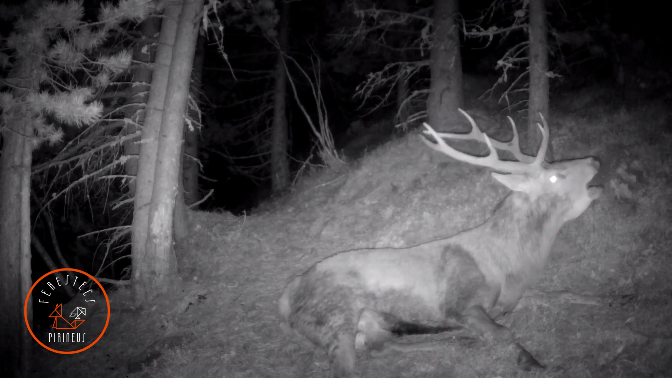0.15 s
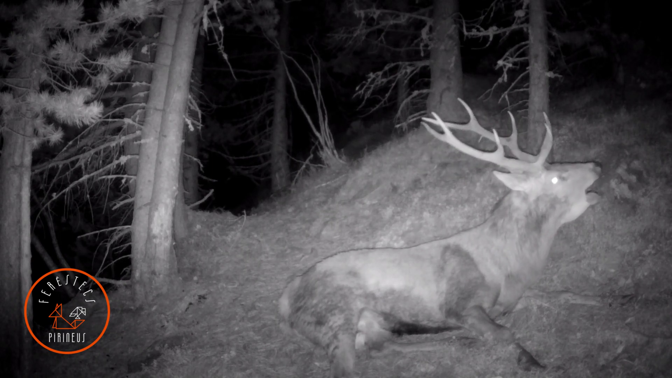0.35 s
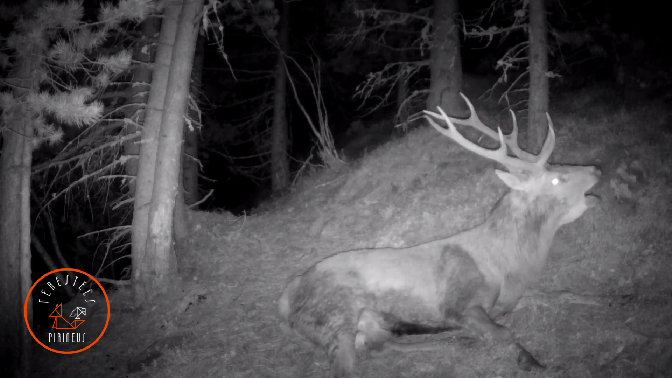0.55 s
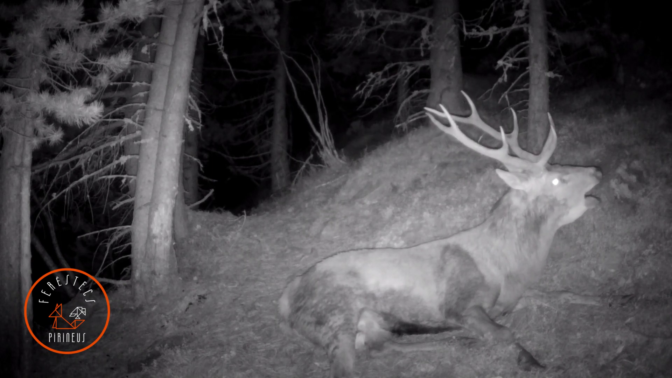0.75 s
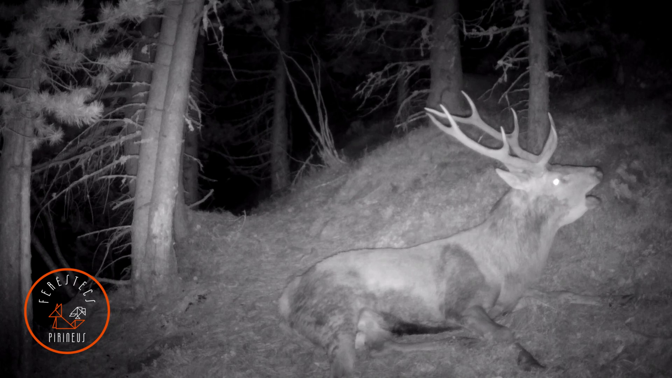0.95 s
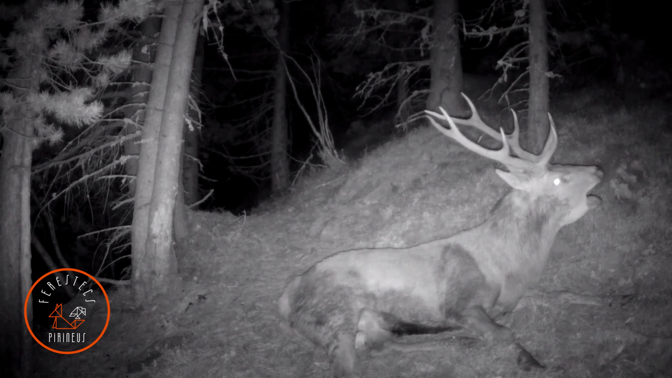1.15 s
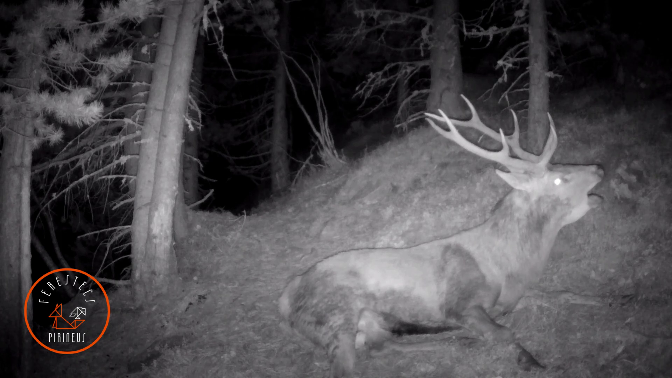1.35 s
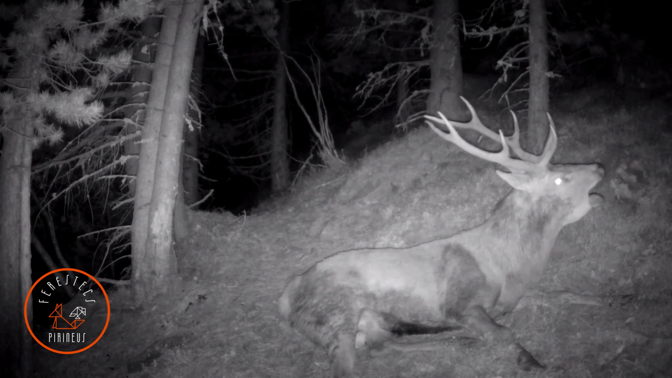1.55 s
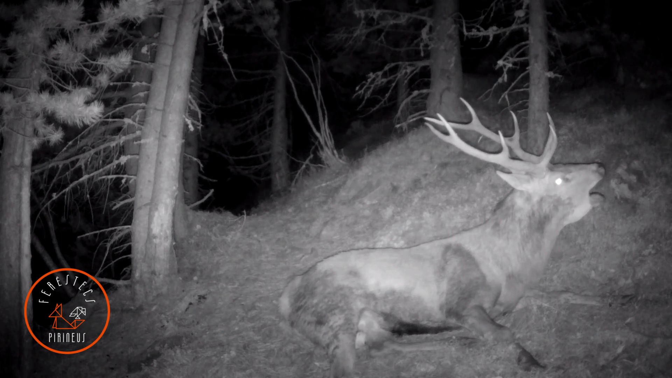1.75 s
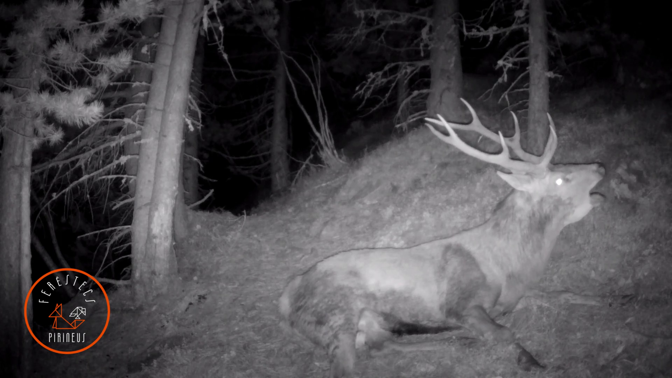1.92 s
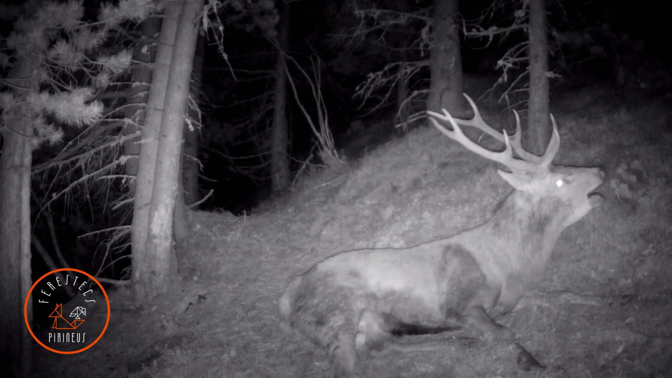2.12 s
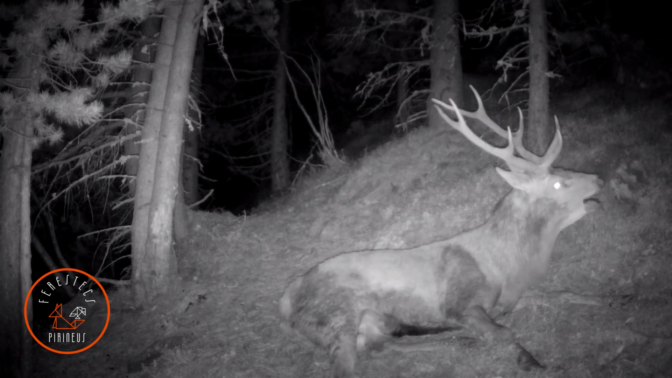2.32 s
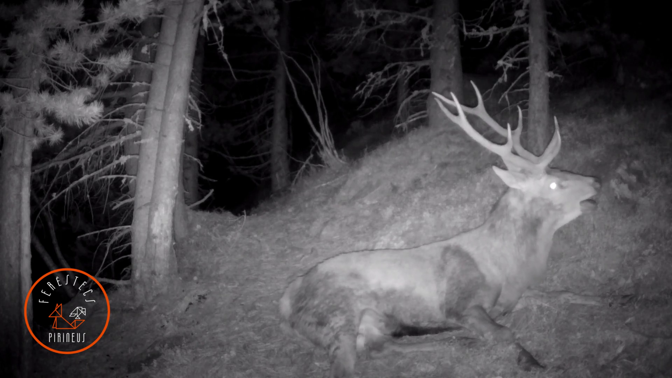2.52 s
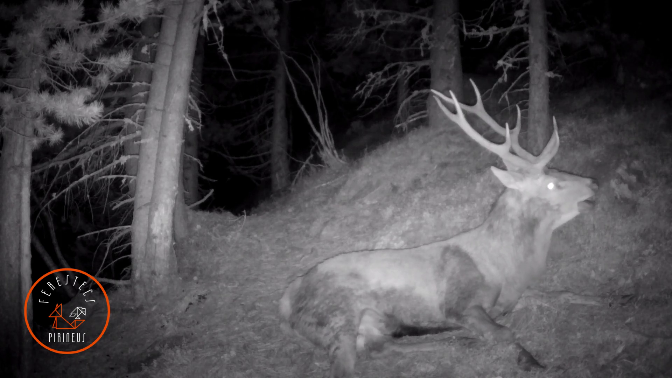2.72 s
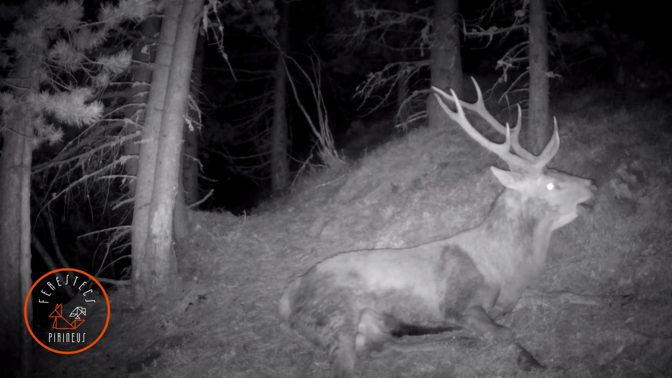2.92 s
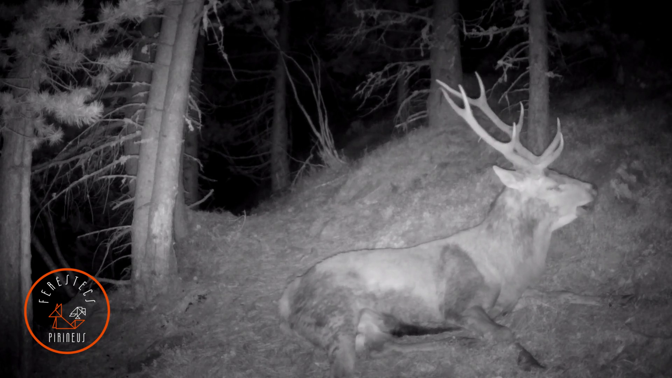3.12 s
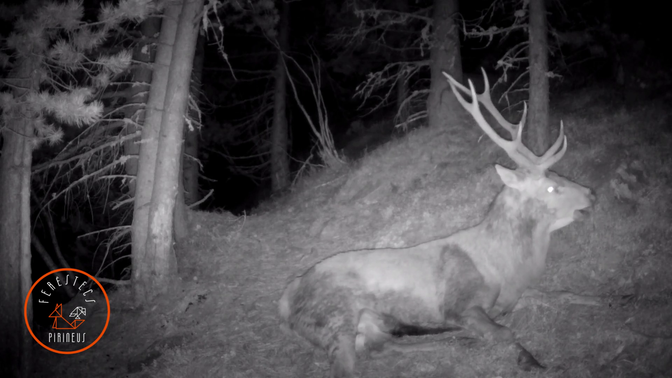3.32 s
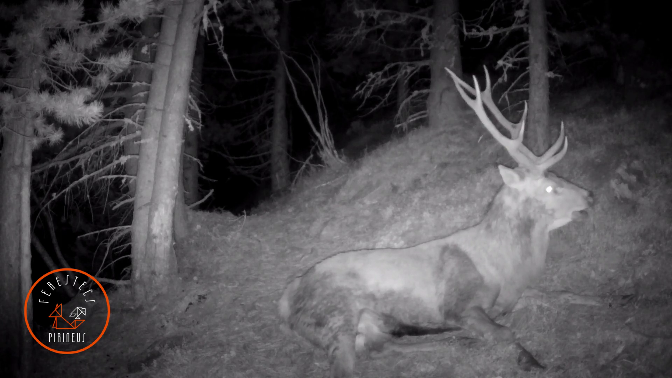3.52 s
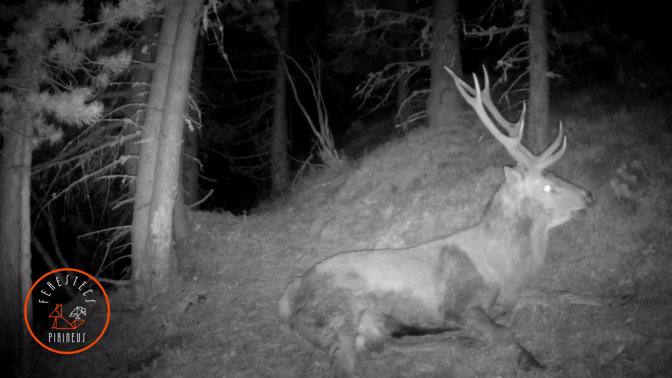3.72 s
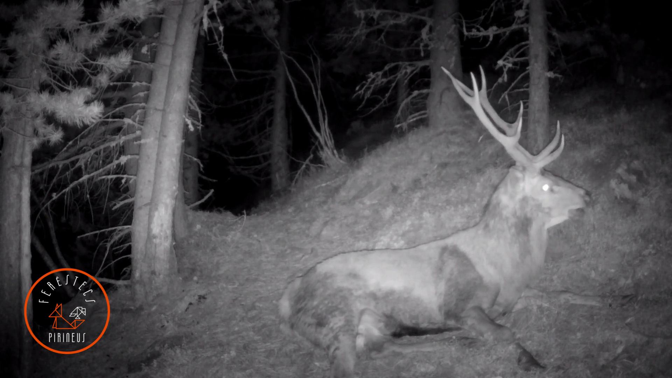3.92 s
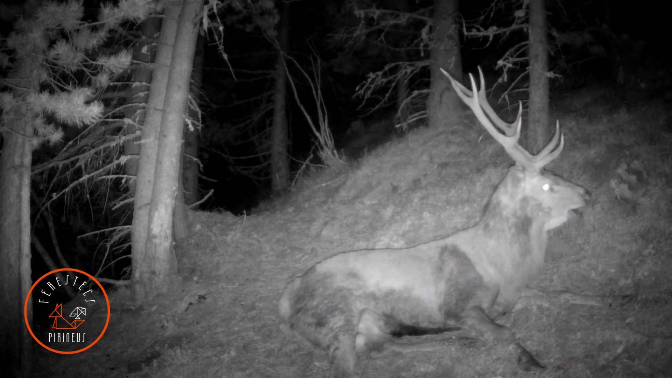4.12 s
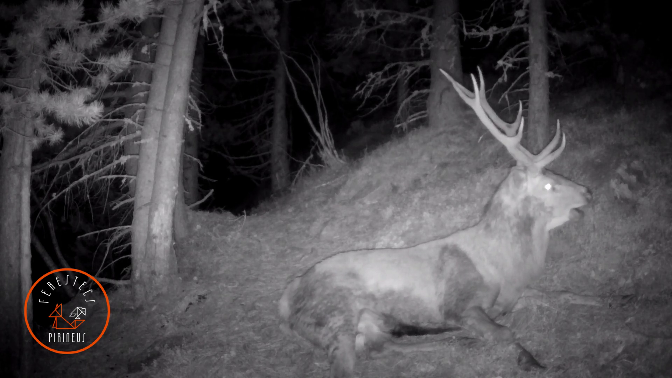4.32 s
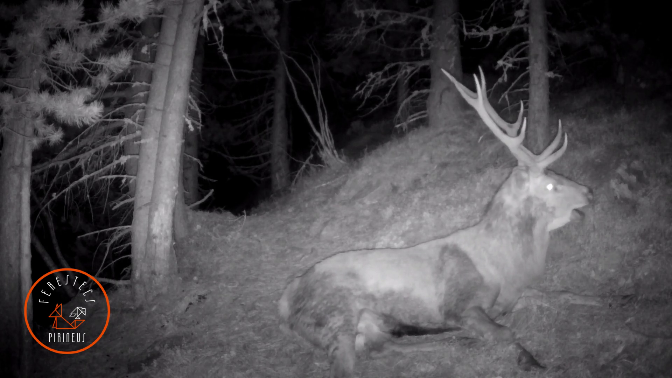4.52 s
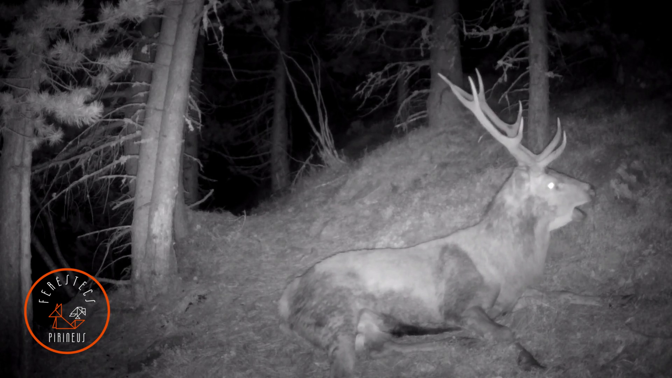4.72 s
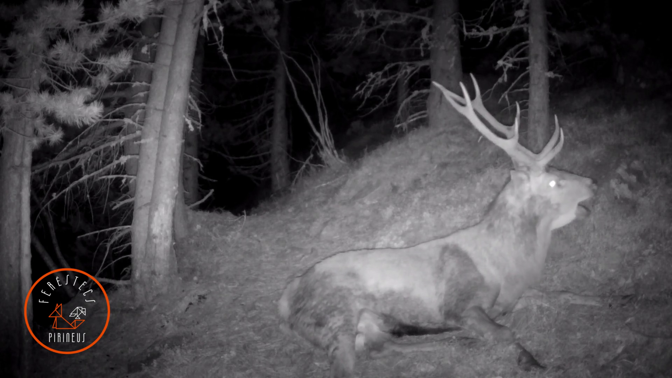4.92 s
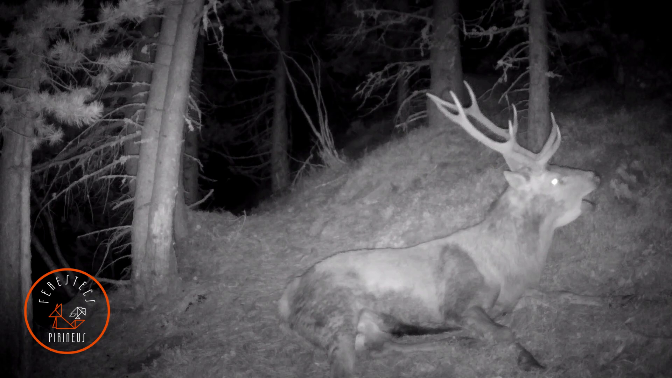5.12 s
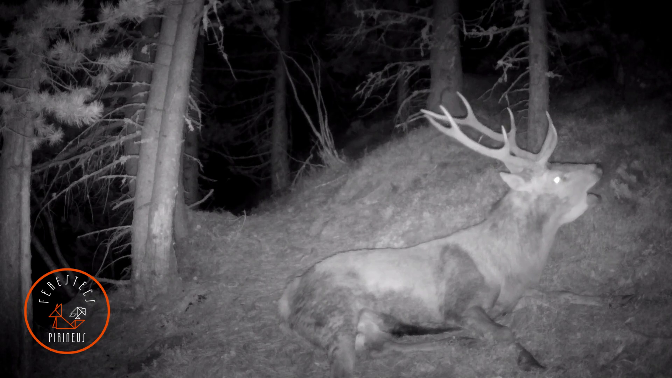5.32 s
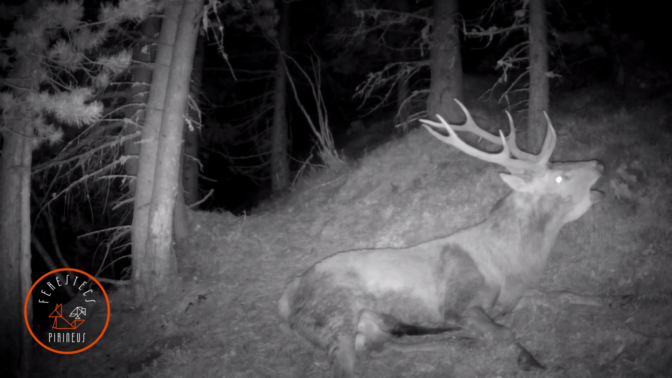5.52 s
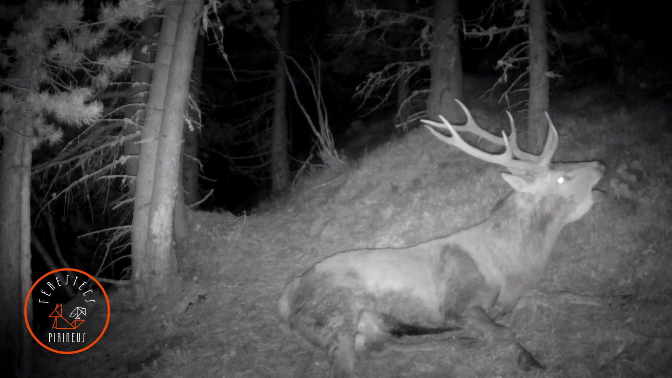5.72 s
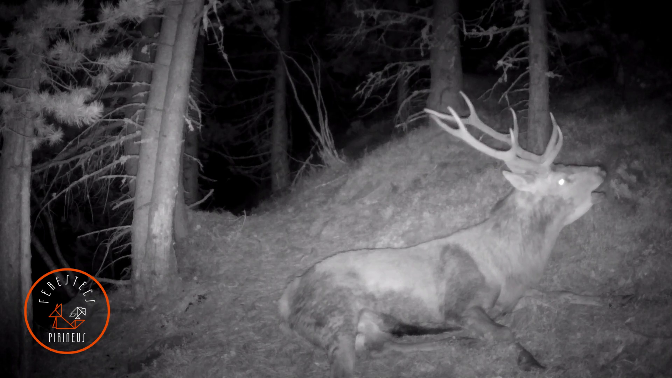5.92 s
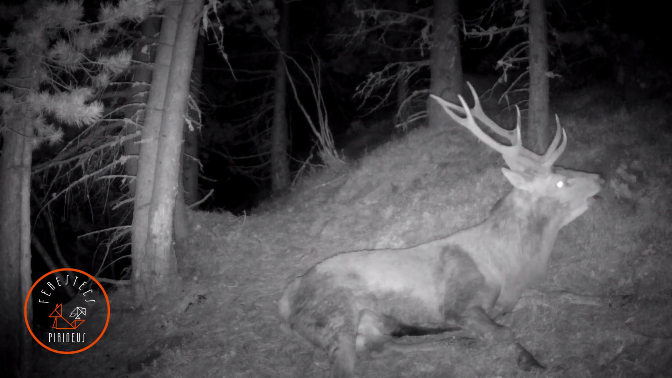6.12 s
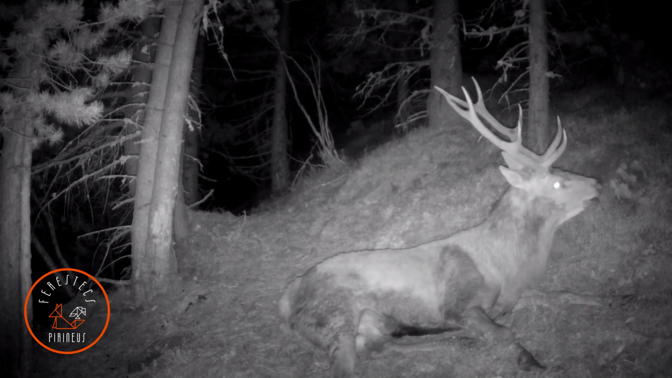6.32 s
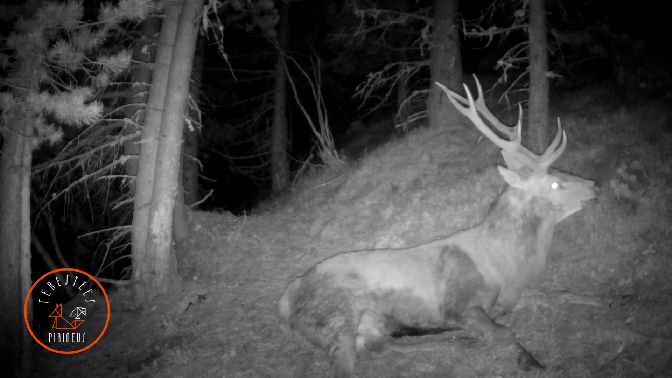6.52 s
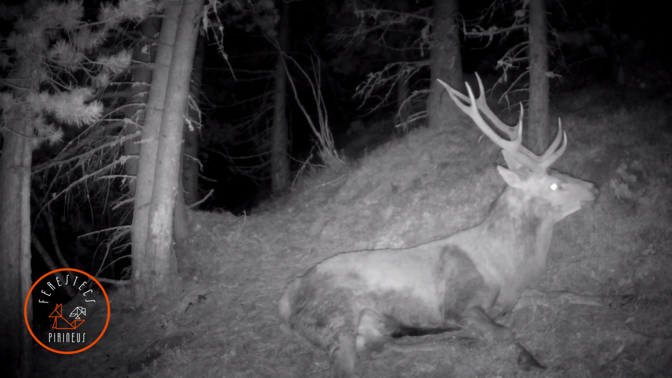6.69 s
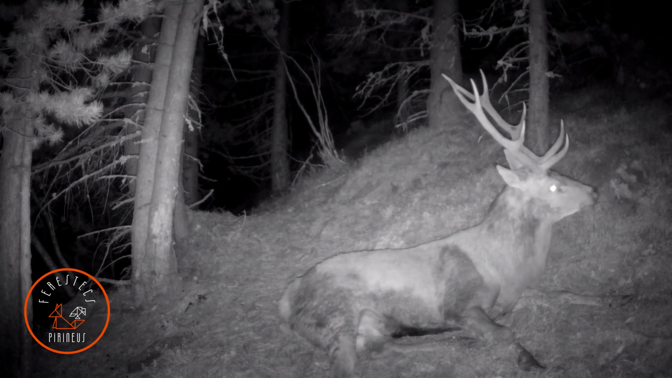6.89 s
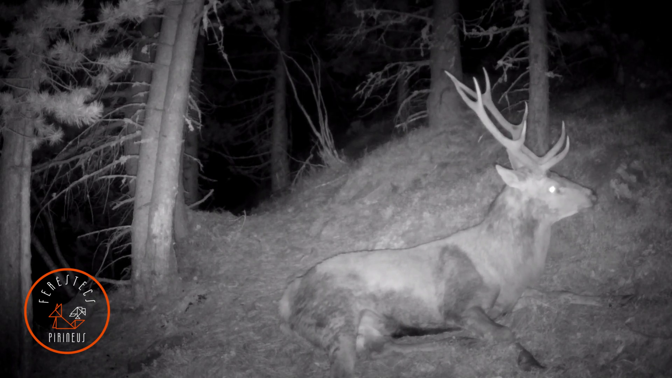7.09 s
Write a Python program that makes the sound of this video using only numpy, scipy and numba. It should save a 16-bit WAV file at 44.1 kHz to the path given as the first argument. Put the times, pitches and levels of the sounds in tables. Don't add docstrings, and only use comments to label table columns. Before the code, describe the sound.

A red deer stag roars close by in a still night forest, caught by a small camera microphone with steady, mid-toned hiss. From 0 s a deep, coarse, buzzing bellow is already in progress; its pitch dips around 0.6 s, rises again towards 1.4 s, then falls and breaks into a few slowing creaks just after 2 s. Faint woodland echo fades into hiss. At about 2.85 s slow creaky pulses start a second roar, lower, quieter and more closed, a groan sinking and weakening until it crackles out near 3.6 s. Another pause. From about 4.13 s a third roar starts pinched and creaky, then opens around 4.7 s, swelling unevenly to a strong, harsh bellow at 5.2 to 5.8 s, with breathy hiss and slight overload. It drops sharply in pitch and stutters to a stop just after 5.9 s, leaving faint echo and microphone hiss.

```python
import sys
import numpy as np
from scipy import signal
from scipy.fft import rfft, irfft, next_fast_len
from scipy.io import wavfile
from scipy.ndimage import map_coordinates
from numba import njit

SR = 44100
rng = np.random.default_rng(int(sys.argv[2]) if len(sys.argv) > 2 else 0)


def boost_factor(decibels):
    exponent = np.asarray(decibels, float) / 20
    return 10 ** exponent


def store_wav(level_fs):
    pcm = np.round(np.clip(np.atleast_2d(level_fs), -1, 1) * 32767)
    wavfile.write(sys.argv[1], SR, pcm.T.astype(np.int16))


N = 315299
LEAD = 4480
SPAN = N + LEAD
TIME = (np.arange(SPAN) - LEAD) / SR


def along(points, hz):
    f, v = np.transpose(points)
    return np.interp(np.log(hz + 1), np.log(f + 1), v)


def coloured(x, points):
    m = next_fast_len(SPAN + 8192)
    gain = boost_factor(along(points, np.fft.rfftfreq(m, 1 / SR)))
    cepstrum = irfft(np.log(gain), m)
    cepstrum[1:m // 2] *= 2
    cepstrum[m // 2 + 1:] = 0
    return irfft(rfft(x, m) * np.exp(rfft(cepstrum)), m)[..., :x.shape[-1]]


def curves(rows):
    s, *cols = np.transpose(rows)
    return [np.interp(TIME, s, c) for c in cols]


def rounded(rows):
    s, *cols = np.transpose(rows)
    k = np.clip(np.searchsorted(s, TIME) - 1, 0, len(s) - 2)
    gap, out = np.diff(s)[k], []
    u = np.clip((TIME - s[k]) / gap, 0, 1)
    for c in cols:
        rise = np.pad(np.diff(c) / np.diff(s), 1, "edge")
        before, after = rise[:-1], rise[1:]
        slope = 2 * np.maximum(after * before, 0) / (after + before + 1e-9)
        bend = (1 - u) * (slope[k] - rise[k + 1]) + u * (rise[k + 1] - slope[k + 1])
        out.append(c[k] + gap * u * (rise[k + 1] + (1 - u) * bend))
    return out


def wobble(rate):
    knots = rng.standard_normal(int(SPAN * rate / SR) + 4)
    return map_coordinates(knots, [np.arange(SPAN) * rate / SR])


def microphone_hiss():
    # pitch_hz [Hz], level_db [dB per Hz]
    hiss_colour = [(30, -40.5), (200, -12.5), (400, -7.5), (700, -1.5), (1350, -2.9), (2000, -12.5),
                   (3000, -24), (4200, -33.5), (5600, -47), (7500, -45.5), (16000, -50.5)]
    hiss = coloured(rng.standard_normal(N), hiss_colour)
    return boost_factor(-60) * hiss / hiss.std()


def echoes(x, decay):
    _, t, z = signal.stft(rng.standard_normal(SR), SR, nperseg=256)
    hz = np.fft.rfftfreq(256, 1 / SR)
    fading = z * boost_factor(-60 * t / along(decay, hz)[:, None])
    tail = signal.istft(fading, SR, nperseg=256)[1]
    late = np.pad(x, (500, 0))
    return signal.fftconvolve(late, tail / np.linalg.norm(tail))[:SPAN]


def capsule(x):
    # pitch_hz [Hz], gain_db [dB]
    output_colour = [(30, -0.5), (200, 2.5), (2500, -2.27), (4500, -9.5), (7200, -15.5), (7800, -18),
                     (16000, -8.5)]
    top = np.where(x > 0, .6, .5)
    squashed = x / (1 + np.abs(x / top) ** 12) ** (1 / 12)
    return coloured(squashed, output_colour)


@njit
def ring(x, hz, radius, gain, scale, leak, step):
    out = np.zeros(len(x))
    for k in range(len(hz)):
        y1 = y2 = 0.0
        for n in range(2, len(x)):
            r = radius[k] * leak[n]
            y = x[n] - x[n - 2] + 2 * r * np.cos(step * hz[k] * scale[n]) * y1 - r * r * y2
            y1, y2 = y, y1
            out[n] += gain[k] * y
    return out


def lips(drive):
    # pitch_hz [Hz], width_hz [Hz], level_db [dB]
    cavities = [(5560, 45, -42), (6200, 40, -35.5), (6900, 100, -42.5)]
    hz, width, db = np.transpose(cavities)
    radius, steady = np.exp(-np.pi * width / SR), np.ones(SPAN)
    return ring(drive, hz, radius, boost_factor(db) * (1 - radius ** 2), steady, steady, 2 * np.pi / SR)


def pulses(s, size):
    tap = np.floor(s * SR)[:, None] + np.arange(-7, 9)
    lag = tap - s[:, None] * SR
    shape = size[:, None] * np.sinc(lag) * np.cos(np.pi * lag / 16) ** 2
    place = np.clip(tap + LEAD, 0, SPAN - 1).astype(int)
    return np.bincount(place.ravel(), shape.ravel(), SPAN)


def creaks(runs, ratio, count):
    s, gap, db, step_db = np.transpose(runs)[..., None]
    k = np.arange(count)
    at = s - .002 + gap * (1 - ratio ** k) / (1 - ratio)
    return pulses(at.ravel(), boost_factor(db + step_db * k + 18.5).ravel())


def folds(rows, scatter_db):
    # time_s [s], level_db [dB]
    level_bumps = [(.1, 3.5), (.15, -2.5), (.26, 3), (.37, 1), (.8, 1.5), (.97, 2), (2.93, 2), (2.975, 2.5),
                   (4.35, 2), (4.49, -0.5), (5.0, -2), (5.08, -2.5), (5.14, -2), (5.235, 2.5), (5.32, -2.5),
                   (5.385, 1), (5.435, -2), (5.525, 0.5), (5.765, -4), (5.795, 2.5)]
    bump_s, edge_s = .027, .025
    effort_db, pitch = rounded(rows)
    for s, db in level_bumps:
        effort_db = effort_db + db * np.exp(-((TIME - s) / bump_s) ** 2)

    start, end = rows[0][0], rows[-1][0]
    glide = np.abs(np.gradient(np.log(pitch))) * SR
    edge = np.exp(-np.minimum(np.abs(TIME - start), np.abs(TIME - end)) / edge_s)
    rough = .02 + .1 * glide + .4 * edge

    pitch = pitch * (1 + .002 * wobble(25))
    on = (TIME >= (start or -1)) & (TIME <= end)
    cycle = np.cumsum(pitch * on) / SR
    s = np.interp(np.arange(int(cycle[-1] + .55)), cycle[on], TIME[on])
    at = (s * SR).astype(int) + LEAD
    late, louder = rng.standard_normal((400, 2))[:len(s)].T
    s = s + late * (.0008 + .06 * rough[at] ** 2) / pitch[at]
    size = boost_factor(effort_db[at] + louder * (scatter_db + 3 * rough[at] ** 2))
    beat = pulses(s, size * np.sqrt(SR / pitch[at]))
    puff = np.cos(np.pi * cycle) ** 2 * rng.standard_normal(SPAN) * on
    return beat, boost_factor(effort_db + 18 * rough) * puff, on


def throat(drive, leak):
    # time_s [s], shortness [pitch factor], chest [extra pitch factor], mouth_opening [0-1]
    larynx = [(0, 0.94, 1.02, .58), (.3, 1.01, 0.99, 0.88), (.5, 1.048, 0.95, 0.98),
              (1.1, 1.034, 1.036, 0.94), (1.9, 1.004, 0.97, 0.93), (2.1, 1.052, 0.99, 0.97),
              (2.8, 1.033, 1.01, 0.21), (3.55, 1.05, 0.93, 0.06), (4.1, 1.26, .97, 0),
              (4.42, 1.32, 1.08, .09), (4.62, 1.28, 0.96, 0.49), (4.8, 1.232, 0.907, 0.92),
              (4.93, 1.14, 0.93, 0.9), (5.15, 1.114, 0.95, 0.7), (5.35, 1.016, 0.92, 0.96),
              (5.8, 1, 1.02, 0.91), (6.0, 1.105, 0.91, 0.5)]
    # pitch_hz [Hz], width_hz [Hz], level_db [dB]
    open_modes = [(206, 12, -13), (477.4, 13.8, 0.5), (639.4, 21.2, -3.5), (944.7, 28, 1.5),
                  (1289, 55.6, -3), (1414.6, 114, -8.5), (1598, 42, -10.5), (1849, 18, -18.5),
                  (2018.5, 17, -10.5), (2239, 35, -16.5), (2426, 21, -18), (2706, 33, -23.5),
                  (3066, 40, -19.5), (3358, 17, -23.5), (3670, 66, -29), (3840, 39, -26.5), (3945, 31, -28)]
    closed_modes = [(218, 450, -24.5), (395, 50, -12), (614, 100, -19), (705, 340, -19.5),
                    (951.4, 18, -7.5), (1178, 110, -15), (1400.4, 54, -5.5), (1689.5, 27, -1.5),
                    (2218, 50, -13.5), (2416, 29, -15.5), (2760, 22, -22), (2920, 90, -32),
                    (3040, 51, -23.5), (3510, 78, -22), (4020, 70, -26.5)]
    # pitch_hz [Hz], gain_db [dB]
    housing = [(60, -16), (150, -7), (250, -9), (380, -3.5), (520, 1.9), (700, -0.9), (880, -5), (1100, 5),
               (1430, 8.5), (1660, 9), (1790, -5.5), (2050, 5), (3980, 6), (4400, -25.5)]
    band_edges = (850, 1150, 1800)
    open_db = (-7, -18.5, 2.12, -13.5)
    closed_db = (-14.5, -18, 2.2, -11.5)
    high_db = (5, 46.5, -5, 3.5)

    short, chest, opening = curves(larynx)
    opening = np.clip(opening, 0, 1)
    upper = short * np.minimum(chest, 1) ** .4
    sink = np.array([short * chest, short, short, upper])
    still = np.ones(sink.shape)
    lift = boost_factor(np.transpose([high_db]) * (sink - 1))
    tremor = 1 + .003 * wobble(14)
    shapes = (
        (open_modes, sink, opening * lift, open_db),
        (closed_modes, 1.04 * still, (1 - opening) * still, closed_db),
    )
    out = np.zeros(drive.shape)
    for modes, scale, share, power_db in shapes:
        hz, width, db = np.transpose(modes)
        radius = np.exp(-np.pi * width / SR)
        gain = boost_factor(db) * (1 - radius ** 2) * (-1.0) ** np.arange(len(hz))
        passed = 4 * boost_factor(db + along(housing, hz)) ** 2 * np.pi * width / SR
        for band in range(len(drive)):
            own = np.digitize(hz, band_edges) == band
            level = boost_factor(power_db[band]) / np.sqrt(passed[own].sum())
            out[band] += ring(drive[band] * share[band], hz[own], radius[own], level * gain[own],
                              scale[band] * tremor, leak, 2 * np.pi / SR)
    return coloured(out, housing)


def stag():
    # time_s [s], effort_db [dB], pitch_hz [Hz]
    first_roar = [(0.0, -11, 132.4), (.15, -13.5, 120.4), (.4, -16, 105.7), (.63, -17, 100.6),
                  (.8, -16.5, 106.7), (1.08, -15, 124.4), (1.36, -12.5, 129.2), (1.9, -14, 118.3),
                  (2.03, -14.5, 105.4)]
    second_roar = [(2.885, -24.5, 79.4), (2.957, -23, 88.65), (3.001, -23, 82.55), (3.096, -22.5, 79.5),
                   (3.238, -22.5, 74.4), (3.361, -24, 68.8), (3.495, -29, 60.35), (3.542, -33.5, 59.2)]
    third_roar = [(4.171, -24.5, 87.1), (4.215, -22.5, 89.12), (4.36, -21.5, 85.57), (5.039, -18, 84.58),
                  (5.25, -15.5, 87.19), (5.561, -16, 101.1), (5.735, -16, 97.23), (5.83, -18, 81.53),
                  (5.923, -17.5, 69.7)]
    # start_s [s], first_gap_s [s], level_db [dB], step_db [dB a pulse]
    starts = [
        (2.839, .020, -30, 7.5),
        (4.128, .0155, -21, 2.5),
    ]
    stops = [
        (2.031, .0095, -5, -3),
        (3.554, .02, -34.5, -5),
        (5.931, .013, -6.5, -5),
    ]
    # pitch_hz [Hz], level_db [dB]
    air_colour = [(3000, -44), (4350, -1), (4900, -15), (5400, -5.5), (5900, -12), (6350, 1), (6900, -5.5),
                  (7300, -13.5), (7600, -50.5)]

    roars = [folds(first_roar, .15), folds(second_roar, .45), folds(third_roar, .3)]
    beat, puff, on = [sum(parts) for parts in zip(*roars)]
    source = beat + puff * boost_factor([[-38], [-36], [-32], [-14]])
    leak = np.exp(-np.pi * 30 * (1 - on) / SR)

    creak = creaks(starts, .8, count=3) + creaks(stops, 1.23, count=5)
    fade = boost_factor(-60 * np.arange(4000) / SR / .08)
    leakage = np.abs(signal.fftconvolve(creak, fade)[:SPAN])
    creak = creak + boost_factor(-23.5) * leakage * rng.standard_normal(SPAN)

    hissing = coloured(puff + .3 * beat + boost_factor(-8.5) * creak, air_colour)
    air = lips(beat + puff + creak) + boost_factor(-26) * hissing
    drive = source + creak * boost_factor([[-2], [-2], [.1], [-3]])
    return throat(drive, leak).sum(0) + air


def scene():
    # pitch_hz [Hz], fade_s [s]
    trunks = [(300, .17), (1500, .21), (3000, .18), (10000, .08)]
    slopes = [(300, 1.8), (1400, 1.1), (3000, 0.84), (10000, 0.35)]
    voice = stag()
    near = boost_factor(-14.5) * echoes(voice, trunks)
    far = boost_factor(-39.5) * echoes(voice, slopes)
    return capsule(voice + near + far)[None, LEAD:]


def top_cut(x):
    return signal.sosfilt(signal.butter(12, 15800, fs=SR, output="sos"), x)


def record(dry):
    mix = dry + microphone_hiss()
    return top_cut(mix)


dry = scene()
out = record(dry)
store_wav(out)
```